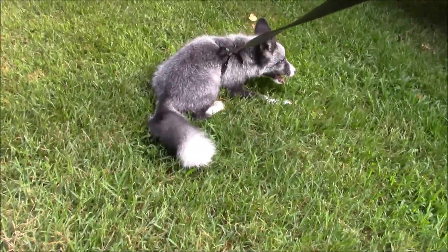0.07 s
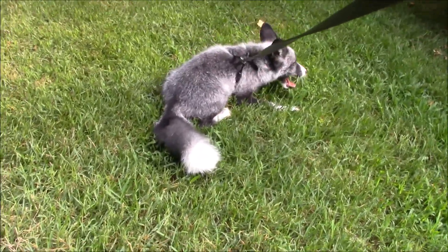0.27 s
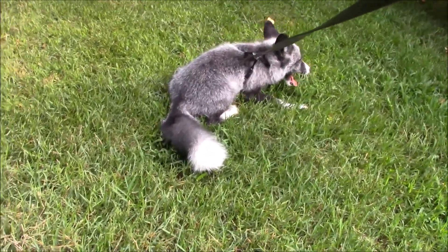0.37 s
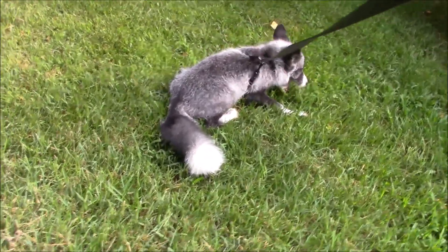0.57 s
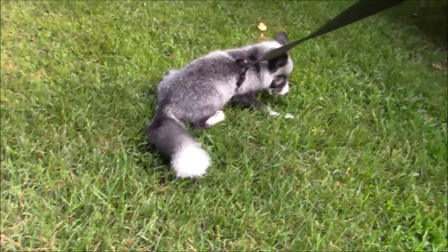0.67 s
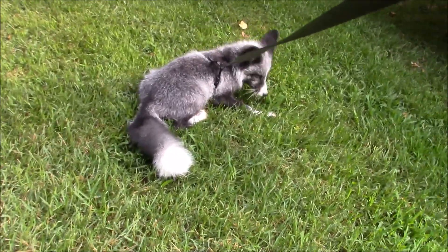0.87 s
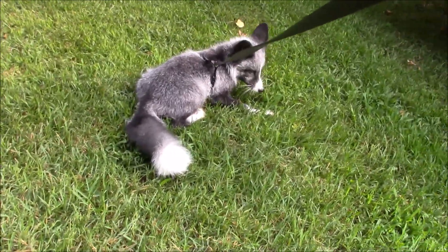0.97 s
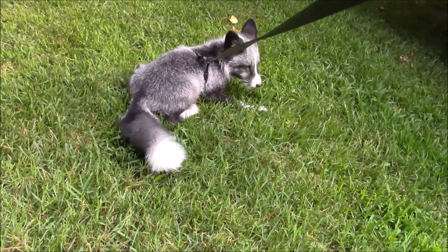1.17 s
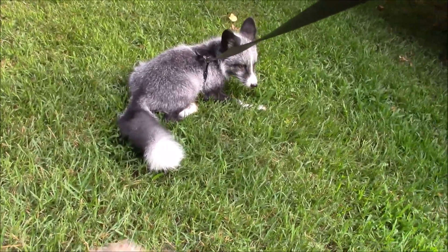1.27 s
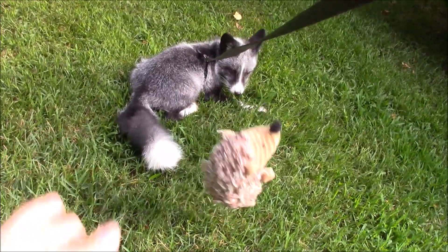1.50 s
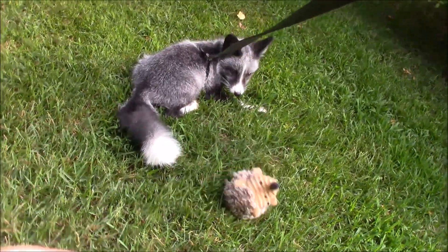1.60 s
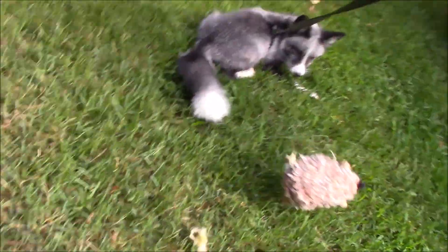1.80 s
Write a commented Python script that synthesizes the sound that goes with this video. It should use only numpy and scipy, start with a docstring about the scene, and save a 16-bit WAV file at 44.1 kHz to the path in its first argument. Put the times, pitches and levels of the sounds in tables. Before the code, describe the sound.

A squeaky toy gives a quick run of high squeaks close by outdoors.

```python
"""On a lawn, close by, a hand quickly pumps a plush toy. Air rushing through its reed makes it squeak
on each squeeze and again as its bulb refills. The last refill is slow and holds a lower, steady note.
The hand ticks and brushes on the plush as the toy is tossed away. The garden returns a faint echo
over a quiet outdoor hum, a distant motor and a fading hiss."""
import sys
import numpy as np
from scipy import signal
from scipy.fft import rfft, irfft, next_fast_len
from scipy.io import wavfile
from scipy.ndimage import uniform_filter1d, minimum_filter1d

SR = 44100
rng = np.random.default_rng(int(sys.argv[2]) if len(sys.argv) > 2 else 0)


def materialize(psi):
    """Save the field psi as 16-bit PCM at rate SR to the path in sys.argv[1].

    A 1-D psi becomes a single channel; in a 2-D psi each row is a channel.
    """
    bounded = np.clip(np.atleast_2d(psi).T, -1, 1)
    quanta = np.round(bounded * 32767).astype(np.int16)
    wavfile.write(sys.argv[1], SR, quanta)


N = 81585
T = np.arange(N) / SR

# One curve for each stroke of air through the reed.
# Each row: time in seconds, pitch in Hz, level of the lowest tone in dB, level of the overtones in dB.
SQUEEZES = [
    [(0.226, 1063, -49, -83), (0.2275, 1077, -17.5, -15), (0.23, 1129, -11, -15.5),
     (0.2385, 1214, -9, -14.5), (0.2499, 1283, -13, -13.5), (0.2639, 1255, -10.5, -14.5),
     (0.2859, 1125, -11.5, -15), (0.2978, 1037, -20, -23), (0.3028, 900, -35, -26)],
    [(0.462, 1085, -55, -49), (0.4635, 1086, -17, -14.5), (0.467, 1184, -8.5, -17),
     (0.4765, 1297, -9.5, -13), (0.4879, 1369, -10.5, -12), (0.5009, 1335, -10, -13),
     (0.5154, 1185, -10.5, -17.5), (0.5234, 1010, -26.5, -22), (0.5298, 891, -50, -34)],
    [(0.657, 1080, -53, -44), (0.659, 1103, -15, -13), (0.6655, 1158, -14.5, -18.5),
     (0.6794, 1316, -3, -12), (0.6854, 1420, -7.5, -13.5), (0.6984, 1422, -8, -15),
     (0.7034, 1377, -8.5, -20), (0.7079, 1153, -17, -12.5), (0.7159, 1028, -35, -21.5),
     (0.7218, 860, -35, -42)],
    [(0.854, 995, -86, -36), (0.856, 1090, -14.5, -20), (0.8625, 1168, -24.5, -13),
     (0.8744, 1295, -7.5, -12.5), (0.8839, 1381, -4.5, -12.5), (0.8924, 1385, -9, -21),
     (0.8964, 1325, -9, -12.5), (0.9024, 1080, -28, -15.5), (0.9084, 1035, -29, -37),
     (0.9129, 850, -36, -32)],
    [(1.043, 1064, -64, -50), (1.045, 1080, -13.5, -20.5), (1.05, 1158, -25.5, -17.5),
     (1.0615, 1312, -9, -10), (1.0689, 1440, -4, -15.5), (1.0804, 1488, -6.5, -18.5),
     (1.0839, 1387, -9, -11), (1.0894, 1045, -27, -23), (1.0949, 1062, -25, -28), (1.1029, 795, -39, -40)],
]
QUICK_REFILLS = [
    [(0.34, 1100, -30, -52.5), (0.343, 1080, -16, -21), (0.3475, 1097, -10.5, -19.5),
     (0.36, 1200, -7.5, -16), (0.3669, 1367, -13, -15), (0.3764, 1339, -12.5, -16),
     (0.3859, 1137, -9.5, -17.5), (0.4009, 1107, -11, -18), (0.4068, 939, -27.5, -23),
     (0.4108, 840, -44, -35)],
    [(0.573, 1007, -34, -53), (0.576, 1076, -18.5, -20), (0.5835, 1103, -13, -19), (0.5954, 1217, -7, -16),
     (0.6019, 1361, -9.5, -23), (0.6069, 1309, -8, -21.5), (0.6159, 1097, -14, -16),
     (0.6259, 1008, -24, -21.5), (0.6319, 820, -31.5, -30)],
    [(0.773, 990, -32, -53), (0.775, 1090, -21.5, -24), (0.7775, 1097, -22.5, -20.5),
     (0.789, 1206, -10, -12.5), (0.7939, 1396, -7.5, -21.5), (0.8019, 1382, -7, -18),
     (0.8074, 1290, -8.5, -15.5), (0.8129, 1086, -20.5, -18), (0.8249, 982, -24, -31),
     (0.8299, 845, -28, -30)],
    [(0.964, 947, -46, -52), (0.966, 1107, -22.5, -22.5), (0.9765, 1198, -13, -12.5),
     (0.9805, 1400, -6, -20), (0.9894, 1410, -7, -19.5), (0.9954, 1377, -8, -18),
     (0.9999, 1308, -10.5, -14), (1.0039, 1133, -18, -18.5), (1.0194, 960, -21, -30.5),
     (1.0229, 760, -42, -31)],
]
SLOW_REFILL = [(1.167, 922, -33, -73), (1.1705, 1052, -20.5, -27), (1.177, 1075, -17, -22.5),
               (1.2009, 1081, -15.5, -20.5), (1.2254, 1056, -16, -18.5), (1.2493, 1044, -20.5, -17),
               (1.2578, 1080, -16.5, -19), (1.2653, 953, -26.5, -24.5), (1.2707, 810, -36, -52)]  # the bulb is let go and fills by itself
# Extra treble, one number in dB for each stroke.
SQUEEZE_TREBLE_DB = [1, 0.81, 1, -2.3, 0.3]
REFILL_TREBLE_DB = [0.61, -0.72, -0.55, -2.5]
# A "colour" says which frequencies are strong. Each row: frequency in Hz, relative level in dB.
SQUEEZE_COLOUR = [(2100, -1), (2700, -0.5), (3200, -10), (3900, -5.5), (4600, -10), (5500, -9), (6300, -13),
                  (7200, -22), (8200, -34.5), (9600, -37.5), (12300, -43.5), (15500, -47)]
REFILL_COLOUR = [(2100, 0), (2700, -1), (3200, -9.5), (3900, -12.5), (4600, -10), (5500, -14.5),
                 (6300, -13), (7200, -29.5), (8200, -30.5), (9600, -33.5), (12300, -39.5), (15500, -45)]
SLOW_COLOUR = [(2120, 1), (3190, -6.5), (4250, -6.5), (5330, -13), (6380, -27.5), (7450, -18), (8500, -21),
               (9600, -16), (10650, -19.5), (11700, -27), (12800, -40), (15000, -44)]
OVERBLOWN_COLOUR = [(2800, -0.5), (4200, 0), (5700, -1), (7050, -12), (7450, 2.5), (8500, -4), (9200, 0.5),
                    (12500, 2)]  # added when the reed is blown too hard
AIR_COLOUR = [(300, -46), (700, 3), (1300, 7), (2600, 4), (4200, 2), (6000, 6.5), (8000, 3), (12000, -17),
              (16000, -19)]
RATTLE_COLOUR = [(1000, -24), (3000, -19), (5500, 7), (9000, 0), (12000, -6), (16000, -24)]
ECHO_COLOUR = [(600, 10), (1250, -3.5), (1500, -7.5), (2600, 1), (4000, 1), (7200, 5), (9000, -13),
               (16000, -28)]
HUM_COLOUR = [(25, -32), (50, -12), (70, -7), (95, 3.5), (150, 1), (250, -7.5), (400, -8.5), (700, -4.5),
              (1100, -7.5), (1900, -14), (2600, -23), (4000, -30), (7300, -29.5), (11000, -47.5),
              (16000, -40)]
HISS_COLOUR = [(1500, 3), (3000, -1.5), (7000, -8), (12000, -10.5), (16000, -19)]
# How the colour shifts during a stroke. Each row: frequency in Hz, change in dB per second.
HAND_OPENING = [(2120, 61), (3190, 27), (4250, -66), (5330, -300), (6380, -200), (7450, 7), (12000, -22)]
NO_CHANGE = [(2000, 0), (16000, 0)]
# The toy in stereo. Each row: frequency in Hz, amount in dB.
TOY_BALANCE = [(1200, .5), (2600, 0.84), (5000, 0.8), (9000, 3), (13000, 0.2)]  # left level minus right level
TOY_WIDTH = [(1200, -28), (2600, -21.5), (5000, -15), (9000, -9), (13000, -18.5)]  # how unlike the two sides are
# Loudness over time. Each row: time in seconds, level in dB.
RATTLE_LEVEL = [(1.232, -68), (1.248, -48), (1.259, -36), (1.266, -47), (1.274, -72)]
HUM_LEVEL = [(0, -45.5), (.4, -45.5), (.65, -46), (1.05, -47), (1.3, -44), (1.9, -45.5)]  # dips under the run of squeaks
HISS_LEVEL = [(0, -39.5), (.06, -56), (.2, -55), (.5, -56), (1.3, -58), (1.85, -74)]
# The reed flips before each refill. Each row: time in seconds, strength in dB.
FLIPS = [(0.3184, -36), (0.565, -44), (0.7695, -34), (0.9595, -37), (1.1615, -33.5)]
# How a flip rings. Each row: frequency in Hz, gain in dB, seconds to fade by 60 dB.
FLIP_RINGS = [(1470, 14.5, 0.0063), (2540, -27, 0.0059), (5450, -31, .003)]
# Two whistles of air. Each row: time in seconds, pitch in Hz, level in dB.
RASP = [(.237, 5900, -47), (.246, 5750, -28), (.268, 5830, -37), (.277, 5700, -34), (.281, 5700, -50)]  # at the height of the first squeeze
SEEP = [(1.28, 3210, -72), (1.35, 3280, -64), (1.41, 3610, -57.5), (1.48, 3450, -66), (1.56, 3150, -85)]  # the last air creeping in
# Fingers on plush. Each row: time of the peak in seconds, level in dB, centre in Hz, width in octaves,
# seconds to rise by 20 dB, seconds to fade by 60 dB.
BRUSHES = [(0.002, -36.5, 1580, 2.2, 0.0034, 0.069), (0.0774, -41, 3530, 0.64, 0.00078, 0.011),
           (0.403, -38, 600, 1.4, 0.0023, 0.048), (1.636, -52.5, 5550, 2, 0.026, 0.11),
           (1.68, -63.5, 8600, .8, 0.02, 0.22)]
# The tick of letting go. Each row: low edge in Hz, high edge in Hz, gain in dB.
TICK_BANDS = [(250, 1900, -9), (2600, 4500, -21), (6400, 8700, -13.5)]


def squeak(curve, colour, treble_db=0, treble_db_per_hz=0, sixth_db=0, air_db=-28,
           change=NO_CHANGE, grit_db=2.5, unsteady=1, end_db_per_octave=-3):
    """One stroke of air shakes the reed: a gliding tone with overtones, plus rushing air."""
    fade_s, ending_s = .002, .0061
    times, *columns = np.transpose(curve)
    on = (T >= times[0] - fade_s / 2) & (T <= times[-1] + fade_s / 2)
    t = T[on]
    hz, low_db, high_db = [uniform_filter1d(np.interp(t, times, c), size=65) for c in columns]
    # The pitch always trembles a little, and much more while it drops fast.
    stall = np.clip(-np.gradient(hz) * SR / 34000, 0, 1)
    jitter = (unsteady * .00054 + .011 * stall) * drift(73, len(t))
    phase = 2 * np.pi * np.cumsum(hz * (1 + jitter)) / SR
    k = np.arange(1, 17)[:, None]  # harmonics: tones at 1 to 16 times the pitch
    harmonic_hz = k * hz
    # Sound bounces off the moving hand and mixes with the direct sound.
    lag_s = .0016 * (1 + unsteady * .059 * drift(9.6, len(t)))
    share = .52 * np.minimum(harmonic_hz / 5100, 1) ** 2
    bounce = 1 + share * np.exp(-2j * np.pi * harmonic_hz * lag_s)
    # At the top of a stroke the reed is overblown: it changes colour and hisses more.
    overblown = np.interp(hz, [1320, 1455], [0, 1])
    shape_db = at_hz(colour, harmonic_hz) + sixth_db * (k == 6)
    shape_db += overblown * at_hz(OVERBLOWN_COLOUR, harmonic_hz)
    shape_db += at_hz(change, harmonic_hz) * (t - t.mean())
    in_treble = np.interp(harmonic_hz, [3900, 4600], [0, 1])
    shape_db += (treble_db + treble_db_per_hz * (hz - hz.mean())) * in_treble
    # Each overtone wavers on its own, and the top ones also flutter fast.
    waver_db = unsteady * 2 * np.array([drift(31, len(t)) for _ in k])
    flutter = np.array([drift(99, len(t)) for _ in k])
    flutter_db = grit_db * np.minimum(harmonic_hz / 8900, 1) ** 2 * flutter
    gain = from_db(shape_db + waver_db + flutter_db) * bounce * (harmonic_hz < SR / 2)
    gain *= from_db(high_db) / np.sqrt(np.sum(abs(gain[1:]) ** 2, axis=0))  # overtones share high_db
    gain[0] = from_db(low_db)
    # As the air runs out, the upper overtones die first (a positive setting lifts them instead).
    ending = np.clip(1 - (t[-1] - t) / ending_s, 0, 1)
    gain *= from_db(end_db_per_octave * ending * np.log2(k))
    phase_offset = .9 * k ** 2  # spread the harmonics' phases so the tone is less peaky
    harmonics = np.sqrt(2) * gain * np.exp(1j * (k * phase + phase_offset))
    side_turns = rng.random(k.shape) + harmonic_hz * lag_s
    spread = from_db(at_hz(TOY_WIDTH, harmonic_hz)) * np.exp(2j * np.pi * side_turns)
    air = from_db(high_db + air_db + 7 * overblown) * noise(AIR_COLOUR)[on]
    from_edge_s = np.minimum(t - t[0], t[-1] - t)
    fade = np.sin(np.pi / 2 * np.minimum(from_edge_s / fade_s, 1)) ** 2
    out = np.zeros((2, N))
    for channel, sign in enumerate((1, -1)):
        balance = from_db(sign * at_hz(TOY_BALANCE, harmonic_hz) / 2)
        tone = np.sum(harmonics * (1 + sign * spread) * balance, axis=0).real
        out[channel, on] = fade * (tone + air)
    return out


def reed_flips():
    """The reed snaps over and rings briefly as the air turns round."""
    clicks, out = np.zeros(N), 0
    for start, db in FLIPS:
        clicks[int(start * SR)] = from_db(db)
    for hz, db, fade_s in FLIP_RINGS:
        decay = from_db(-60 / (fade_s * SR))
        step = 2 * np.pi * hz / SR
        ring = signal.lfilter([0, np.sin(step)], [1, -2 * decay * np.cos(step), decay ** 2], clicks + 1e-18)
        out += from_db(db) * ring
    return out


def reed_rattle():
    """The reed rattles as the slow refill runs out: a short, bright noise."""
    return level(RATTLE_LEVEL) * noise(RATTLE_COLOUR)


def whistle(curve, width_hz):
    """Air whistles through a narrow gap, and its swirling blurs the note."""
    times, hz, db = np.transpose(curve)
    phase = 2 * np.pi * np.cumsum(np.interp(T, times, hz)) / SR
    blurred = drift(width_hz) * np.cos(phase) + drift(width_hz) * np.sin(phase)
    return level(np.c_[times, db]) * blurred


def handling():
    """Fingers rub the plush in short bursts and let go of it with a tick."""
    click = (np.arange(N) == int(1.4305 * SR)) + 1e-18
    out = sum(from_db(db) * band(click, [low, high]) for low, high, db in TICK_BANDS)
    for peak_s, db, hz, octaves, rise_s, fade_s in BRUSHES:
        edges_hz = np.clip(hz * 2 ** (np.array([-.5, .5]) * octaves), 20, .45 * SR)
        rub = rms_one(band(rng.standard_normal(N), edges_hz))
        rise_db = -20 * np.maximum(peak_s - T, 0) / rise_s
        fade_db = -60 * np.maximum(T - peak_s, 0) / fade_s
        out += rub * from_db(db + rise_db + fade_db)
    return out


def low_thump(toy):
    """A faint, very low thump follows the power of each loud squeak."""
    power = uniform_filter1d(toy ** 2, size=400)
    return from_db(-57.5) * rms_one(band(power, [17.5, 35], order=1))


def garden_echo(toy, delay_s=.0156, fade_s=.43):
    """Hedges and walls send back scattered echoes that die away."""
    tail = from_db(-60 * T / fade_s) * (T > delay_s)
    echoes = wide_noise(ECHO_COLOUR, side_db=-11.5) * tail / np.sqrt(np.sum(tail ** 2))
    return from_db(-29) * signal.fftconvolve(echoes, toy[None], axes=1)[:, :N]


def distant_motor(hz=210, db=-61.5):
    """A far motor drones on one slightly wandering note."""
    tone = np.sqrt(2) * np.sin(2 * np.pi * hz * T + .5 * drift(1.5))
    return from_db(db + 2 * drift(1.2)) * tone


def outdoors():
    """The surroundings hum quietly under a fading hiss."""
    hum = level(HUM_LEVEL) * wide_noise(HUM_COLOUR, side_db=-18)
    hiss = level(HISS_LEVEL) * wide_noise(HISS_COLOUR, side_db=-18)
    return hum + hiss


def from_db(db):
    """Turn decibels into a number to multiply by."""
    return 10 ** (np.asarray(db) / 20)


def rms_one(x):
    """Scale a signal so its average power is 1."""
    return x / np.sqrt(np.mean(x ** 2) + 1e-20)


def at_hz(points, hz):
    """Read between a table's rows, giving every octave equal room."""
    row_hz, value = np.transpose(points)
    return np.interp(np.log(np.maximum(hz, 1)), np.log(row_hz), value)


def level(rows):
    """Follow a loudness curve, with silence before and after it."""
    times, db = np.transpose(rows)
    return from_db(np.interp(T, times, db)) * (T >= times[0]) * (T <= times[-1])


def band(x, edges_hz, order=2):
    """Keep the frequencies between two edges."""
    return signal.sosfilt(signal.butter(order, edges_hz, "band", fs=SR, output="sos"), x)


def drift(rate_hz, size=N):
    """A smooth random wander, about 1 in size."""
    r = np.exp(-2 * np.pi * rate_hz * 20 / SR)  # one random step every 20 samples
    steps = rng.standard_normal(size // 20 + 4000)
    slow = rms_one(signal.lfilter([1], [1, -2 * r, r * r], steps)[2000:])
    return np.interp(np.arange(size) / 20, np.arange(len(slow)), slow)


def noise(colour):
    """Noise of a given colour, with average power 1."""
    size = next_fast_len(N)
    hz = np.arange(size // 2 + 1) * SR / size
    spectrum = rfft(rng.standard_normal(size)) * from_db(at_hz(colour, hz))
    return rms_one(irfft(spectrum, size)[:N])


def wide_noise(colour, side_db):
    """Stereo noise: a shared part, plus a weaker part that is opposite left and right."""
    return noise(colour) + from_db(side_db) * noise(colour) * np.array([[1], [-1]])


def scene():
    """Add up the toy, its echo, the hand and the background."""
    toy = np.zeros((2, N))
    for curve, treble_db in zip(SQUEEZES, SQUEEZE_TREBLE_DB):
        toy += squeak(curve, SQUEEZE_COLOUR, treble_db)
    # Drawn backwards, the reed has a weak sixth harmonic and loses treble as its pitch rises.
    for curve, treble_db in zip(QUICK_REFILLS, REFILL_TREBLE_DB):
        toy += squeak(curve, REFILL_COLOUR, treble_db, treble_db_per_hz=-.0053, sixth_db=-10)
    toy += squeak(SLOW_REFILL, SLOW_COLOUR, air_db=-54, change=HAND_OPENING,
                  grit_db=1.5, unsteady=.52, end_db_per_octave=5)
    toy += reed_rattle() + reed_flips()
    toy += whistle(RASP, width_hz=150) + whistle(SEEP, width_hz=210)
    mono = toy.mean(axis=0)
    return toy + garden_echo(mono) + low_thump(mono) + handling() + distant_motor() + outdoors()


def record(dry):
    """Turn the loudest peaks down quickly, then cut off the very highest treble."""
    peak_limit, cutoff_hz = .9, 15700
    gain = peak_limit / np.maximum(abs(dry).max(axis=0), peak_limit)
    gain = uniform_filter1d(minimum_filter1d(gain, size=130), size=130)
    return signal.sosfilt(signal.ellip(10, .1, 80, cutoff_hz, fs=SR, output="sos"), dry * gain)


dry = scene()
out = record(dry)
materialize(out)
```